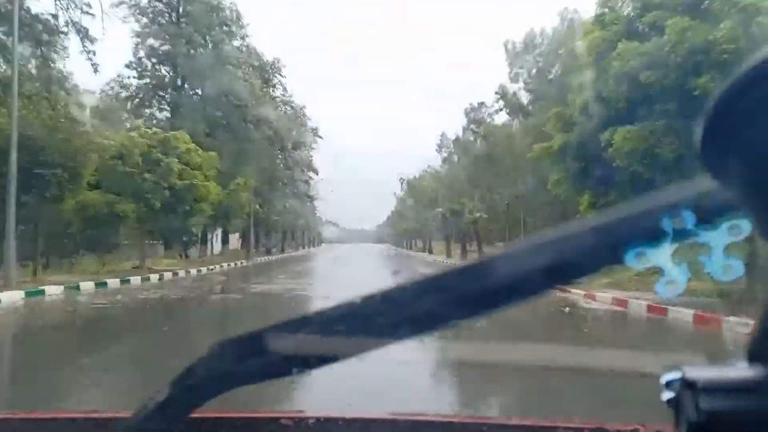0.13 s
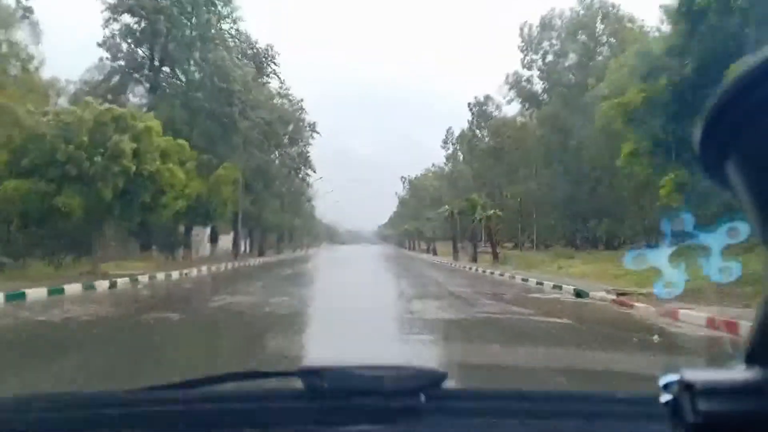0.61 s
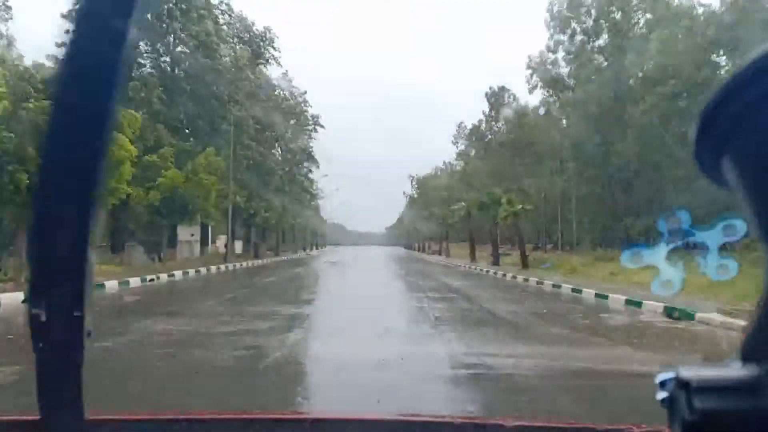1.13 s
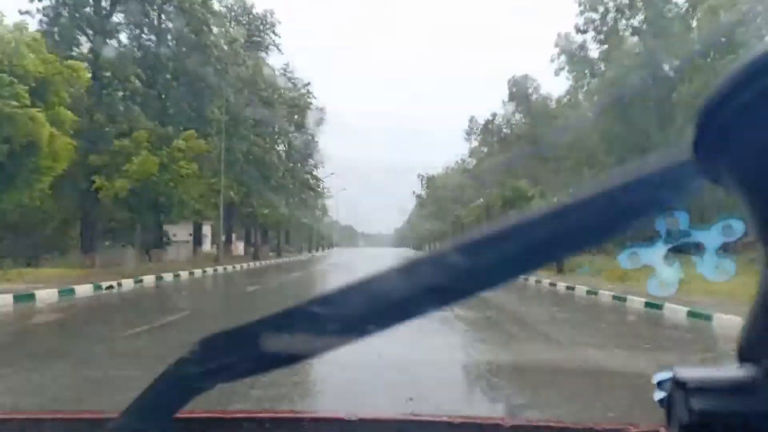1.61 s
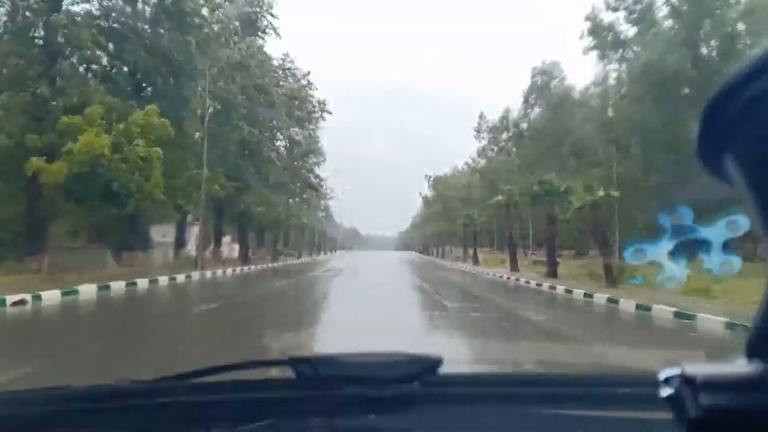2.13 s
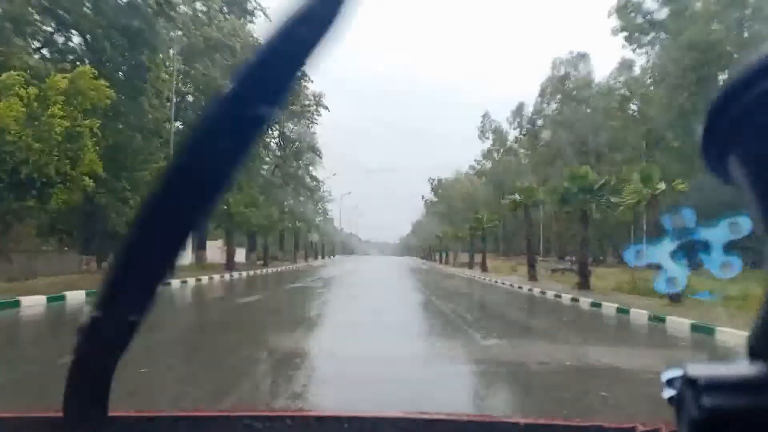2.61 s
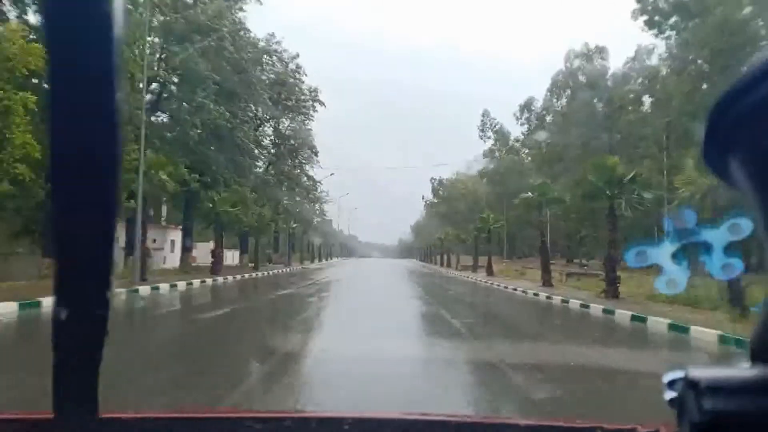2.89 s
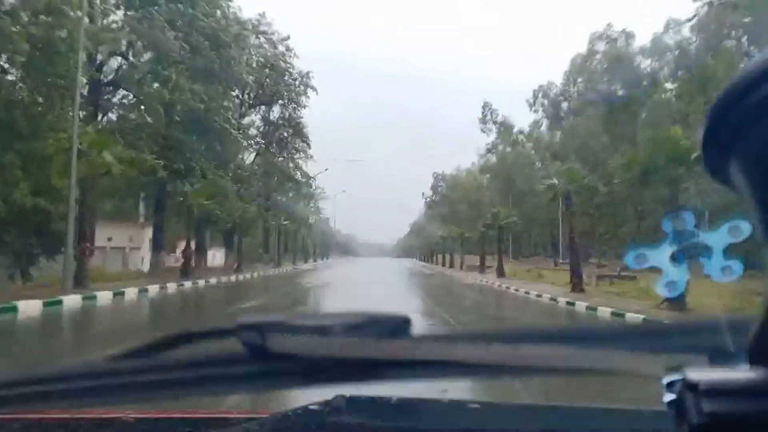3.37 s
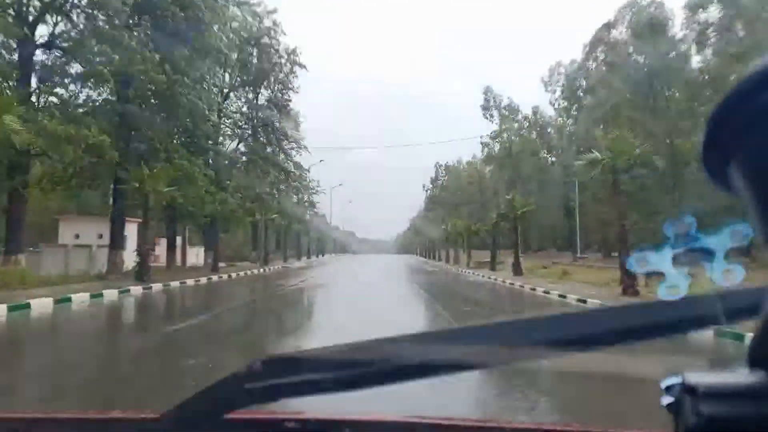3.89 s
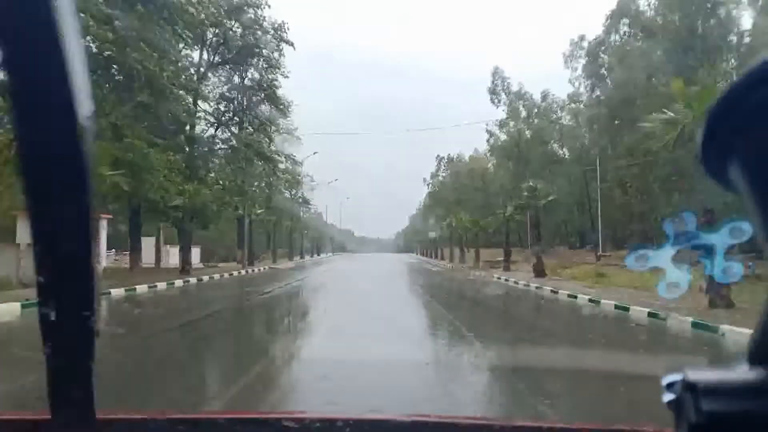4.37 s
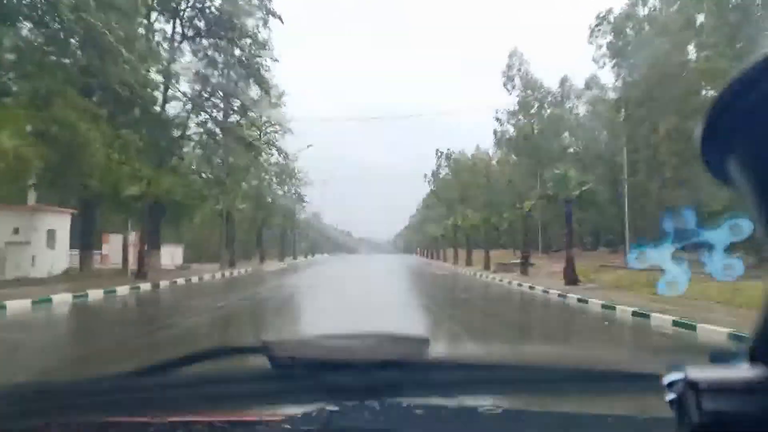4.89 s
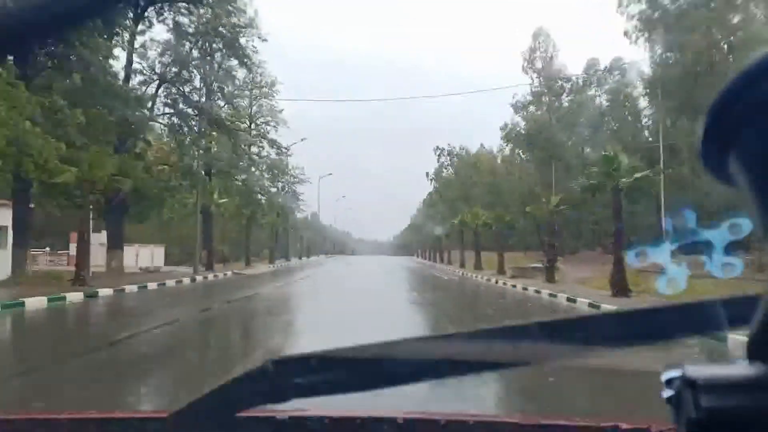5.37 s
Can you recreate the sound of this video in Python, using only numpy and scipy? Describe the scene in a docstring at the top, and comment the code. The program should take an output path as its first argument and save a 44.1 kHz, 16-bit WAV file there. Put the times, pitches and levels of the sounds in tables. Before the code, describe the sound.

Heard from inside a car driving through rain: countless small drops patter over a soft hiss of spray, with bigger drops ticking sharply at irregular moments. A deep engine drone and lumpy road rumble fill the cabin throughout, rising slightly. Wipers thump at about 1.4, 2.9 and 4.4 seconds. The stereo microphone is close inside the cabin, with wide rain and central bass.

```python
"""Inside a car driving through heavy rain: drops tick on roof and windscreen over a hiss of spray,
the road and engine boom in the cabin, and the wipers thump each time they turn round.
Rain and wiper blows are noise shaped as rings of the shell, the road is lumpy filtered noise,
engine, boom and whine are wavering sines.
Two microphone ports share the bass and hear the treble each in its own way."""
import sys
import numpy as np
from scipy import signal
from scipy.fft import rfft, irfft
from scipy.io import wavfile
from scipy.ndimage import uniform_filter1d, map_coordinates

SR = 44100
rng = np.random.default_rng(int(sys.argv[2]) if len(sys.argv) > 2 else 0)


def volts(x):
    """Linear amplitude factor 10**(x/20) for a level x in dB, scalar or array-like."""
    e = np.asarray(x, float) / 20
    return 10 ** e


def pcm_store(signal):
    """Save signal as 16-bit PCM."""
    levels = np.round(np.clip(np.atleast_2d(signal), -1, 1) * 32767)
    wavfile.write(sys.argv[1], SR, levels.astype(np.int16).T)


N = 242991

# Rain strength over time: (t/s, level/dB)
RAIN = [(0, -47), (.25, -49), (.42, -45.5), (.5, -45), (.62, -45.5), (.7, -48), (.87, -48), (1.47, -49),
        (1.89, -50), (2.19, -48.5), (2.73, -50), (3.61, -49), (3.78, -49.5), (4.22, -47), (4.42, -45),
        (4.77, -47), (5.17, -46), (5.51, -48)]
# Colour of rain as it passes roof lining and glass: (f/Hz, relative level/dB)
SHELL = [(530, -26), (900, -2), (1150, -9), (1400, -10.5), (1700, -5.5), (2050, -3), (2450, 0), (2750, -2),
         (3100, -8), (3500, -12.5), (4300, -11.5), (5100, -11), (5700, -15), (6400, -22), (7000, -26.5),
         (7700, -35), (9000, -43), (11700, -67.5), (19800, -120)]
# Colour of the thin top hiss and of the spit of a drop: (f/Hz, relative level/dB)
AIR = [(4410, -29), (7500, -4), (9120, -4.5), (9720, -12.5), (11300, -1.5), (12600, -7), (13800, 0),
       (15000, -1.5), (15600, -11)]
TREBLE_HZ = 3485  # where the body of the rain gives way to its treble


def evened(x):
    """Scales to rms 1."""
    return x / np.sqrt(np.mean(x ** 2) + 1e-20)


def height(x):
    """Top of the envelope, smoothed over 3 ms and both ports."""
    return np.sqrt(2 * uniform_filter1d((x ** 2).mean(0), size=130).max())


def read(points, hz):
    """Reads a table on a log frequency axis."""
    f, value = np.transpose(points)
    return np.interp(np.log(hz + 1), np.log(f + 1), value)


def curves(rows, t):
    """The columns of a table at the times t."""
    s, *columns = np.transpose(rows)
    return [np.interp(t, s, c) for c in columns]


def add(mix, s, sound):
    """Mixes a two-channel sound in at time s."""
    part = mix[:, round(s * SR):][:, :sound.shape[1]]
    part += sound[:, :part.shape[1]]


def band(x, lo_hz, hi_hz):
    """Steep band-pass without delay."""
    hz = np.fft.rfftfreq(x.shape[-1], 1 / SR) + 1e-3
    loss = np.sqrt((1 + (lo_hz / hz) ** 12) * (1 + (hz / hi_hz) ** 12))
    return irfft(rfft(x) / loss, x.shape[-1])


def coloured(x, db):
    """Applies a spectrum given in dB for every bin."""
    return irfft(rfft(x) * volts(db), x.shape[-1])


def wobble(per_s):
    """A smooth random curve of rms 1 with per_s knots a second."""
    knots = rng.standard_normal(int(N / SR * per_s) + 3)
    return evened(map_coordinates(knots, [np.arange(N) / SR * per_s], order=3))


def hum(hz, db, waver, flutter_db):
    """A tone: a sine that wavers a little in pitch (waver: rms share of hz) and strength."""
    turns = np.cumsum(hz * (1 + waver * wobble(12))) / SR + rng.random()
    return np.sqrt(2) * volts(db + flutter_db * wobble(14)) * np.sin(2 * np.pi * turns)


def thud(lo_hz, hi_hz, rise_s, t60):
    """A dull burst from a panel with too many damped modes to tell apart, alike in both ports."""
    t = np.arange(8000) / SR
    burst = band(rng.standard_normal((1, len(t))), lo_hz, hi_hz)
    burst *= (1 - np.exp(-t / rise_s)) * volts(-60 * t / t60)
    return burst / height(burst) * np.ones((2, 1))


def ticks(count, size=2048, spot_db=3.0):
    """Rings of the shell, one per spot and port: a dense noise of modes whose treble dies first."""
    # Decay of the shell before any further damping: (f/Hz, t60/s)
    shell_ring = [(1000, 0.15), (2500, 0.058), (5000, 0.022), (12000, 0.017)]
    port_lag_s, from_right = 0.00042, 0.65  # ticks reach the near port first; share from the right
    likeness = 0.3  # of the two ports
    crack, crack_s = 0.6, 0.002  # the first instant of a tick stands out of its ring
    hz, t, z = signal.stft(rng.standard_normal((count, 2, size)), SR, nperseg=64)
    colour_db = spot_db * rng.standard_normal((count, 1, len(hz), 1))  # each spot favours its own modes
    z = z * volts(colour_db - 60 * t / read(shell_ring, hz)[:, None])
    ring = signal.istft(z, SR, nperseg=64)[1][..., :size]
    lags = round(port_lag_s * SR) * np.where(rng.random(count) < from_right, 1, -1)
    own = np.sqrt(1 - likeness ** 2)
    ring[:, 0] = [likeness * np.roll(right, lag) + own * left for (left, right), lag in zip(ring, lags)]
    age = np.arange(size) / SR
    ring *= (1 - np.exp(-age / 0.00043)) * (1 + crack * np.exp(-age / crack_s))
    padded = np.pad(ring, ((0, 0), (0, 0), (0, 256)))
    return coloured(padded, read(SHELL, np.fft.rfftfreq(size + 256, 1 / SR)))


def blow(ring, db, treble_db, top_db, pan_db, low_db, t60=0.2):
    """One blow on the shell: its body and treble ring, and a short spit of spray on top."""
    low_hz = 2000  # low_db weighs the ring below this
    t = np.arange(ring.shape[1]) / SR
    ring = ring * volts(-60 * t / t60)
    body = band(ring, low_hz, TREBLE_HZ) + volts(low_db) * band(ring, 1, low_hz)
    treble = band(ring, TREBLE_HZ, SR)
    spit = rng.standard_normal(ring.shape) * volts(-60 * t / 0.01)
    spit = coloured(spit, read(AIR, np.fft.rfftfreq(len(t), 1 / SR)))
    layers = ((body, db), (treble, treble_db), (spit, top_db))
    pan = volts([[pan_db / 2], [-pan_db / 2]])  # left over right
    return sum(volts(d) * x / height(x) for x, d in layers) * pan


def patter(per_s, spread_db, spray, treble_spray):
    """Countless small drops on many spots, a few larger, over the even hiss of spray."""
    usual_db, usual_treble_db = -48, -56  # body and treble of rain at its usual strength
    brighten = 1.8  # treble dB gained per dB of strength
    spots = ticks(count=24)
    size = volts(spread_db * np.minimum(rng.exponential(1, N), 4)) * (rng.random(N) < per_s / SR)
    spot = rng.integers(0, len(spots), N)
    taps = np.zeros((2, N))
    for k, ring in enumerate(spots):
        taps += signal.oaconvolve((size * (spot == k))[None], ring, axes=1)[:, :N]
    hiss = coloured(rng.standard_normal((2, N)), read(SHELL, np.fft.rfftfreq(N, 1 / SR)))
    share = np.array([[[spray]], [[treble_spray]]])  # power share of the hiss
    low, high = np.sqrt(1 - share) * evened(taps) + np.sqrt(share) * evened(hiss)
    body_db, = curves(RAIN, np.arange(N) / SR)
    treble_db = usual_treble_db + brighten * (body_db - usual_db)
    body = evened(band(low, 1, TREBLE_HZ))
    treble = evened(band(high, TREBLE_HZ, SR))
    return volts(0.34 * wobble(11)) * (volts(body_db) * body + volts(treble_db) * treble)


def drops():
    """Large drops and middling ones that follow the rain, each on its own spot, and a few dull taps."""
    # The largest drops, at the height of the tick: (t/s, body level/dB, treble level/dB, top level/dB)
    large = [(.0869, -43.5, -56.5, -76.5), (.1635, -33.5, -38.5, -60), (.2534, -39.5, -47.5, -60.5),
             (.2616, -45.5, -44, -66.5), (.2796, -38.5, -44.5, -70), (.4134, -36, -40.5, -62.5),
             (.4736, -40, -45.5, -61), (.5117, -41, -43.5, -70), (.5204, -41, -38, -61),
             (.566, -41.5, -44, -60), (.594, -34.5, -47.5, -65.5), (.636, -47.5, -48, -77),
             (.7878, -42, -40, -62.5), (.829, -43, -46, -67), (.9092, -44.5, -46, -67.5),
             (.9236, -33.5, -46, -70), (.9733, -43.5, -44, -85), (1.0013, -35.5, -39, -61.5),
             (1.0345, -38.5, -43, -81), (1.0454, -47, -40, -69.5), (1.0938, -37.5, -40, -71),
             (1.1422, -53.5, -45.5, -61.5), (1.2551, -41.5, -43.5, -75), (1.323, -58.5, -44.5, -65.5),
             (1.4517, -45, -48.5, -71.5), (1.542, -35, -46, -61.5), (1.6268, -40.5, -42.5, -61),
             (1.7645, -39, -50, -73), (1.9504, -47.5, -49.5, -69), (1.9994, -45.5, -54.5, -72),
             (2.0435, -41.5, -41.5, -70), (2.0585, -38.5, -40, -61.5), (2.2964, -36.5, -41, -68),
             (2.307, -47, -44, -63), (2.4188, -46.5, -46.5, -65.5), (2.8964, -35.5, -43.5, -69),
             (2.922, -46.5, -46, -67.5), (2.9588, -39, -38, -83), (2.9834, -41, -47.5, -68.5),
             (3.0985, -40, -51.5, -67.5), (3.143, -45.5, -43.5, -78), (3.3449, -41.5, -41, -65),
             (3.3603, -36.5, -45, -67.5), (3.3793, -47, -47, -68.5), (3.425, -47, -45, -71),
             (3.4455, -35.5, -46, -65.5), (3.4984, -48, -45, -73.5), (3.601, -46, -47, -70),
             (3.66, -45, -48, -67.5), (3.719, -48, -48.5, -69), (3.7485, -42, -43.5, -64),
             (3.7626, -29.5, -41.5, -74), (3.8052, -53, -39.5, -63.5), (3.813, -44.5, -46, -63),
             (3.841, -38.5, -59, -80), (3.8872, -37.5, -44.5, -72.5), (4.149, -37.5, -50, -71),
             (4.18, -36.5, -51.5, -78.5), (4.274, -34.5, -48, -59.5), (4.3694, -39, -46, -64.5),
             (4.442, -43, -47, -70.5), (4.5093, -44.5, -43.5, -75.5), (4.5415, -40, -38.5, -60.5),
             (4.5965, -50, -48.5, -66.5), (4.5795, -41, -53, -70), (4.6808, -40, -45.5, -58.5),
             (4.743, -39, -44.5, -68), (4.8233, -38, -48, -64.5), (4.9141, -38.5, -51.5, -77),
             (4.9349, -33.5, -41, -71.5), (5.0526, -31, -40, -57.5), (5.0716, -40.5, -47.5, -67.5),
             (5.0997, -39, -40, -59), (5.196, -50, -43.5, -67), (5.2436, -34, -43, -62.5),
             (5.2905, -51.5, -43.5, -71), (5.3244, -37.5, -40.5, -63), (5.3599, -34.5, -46, -79)]
    # Dull taps, heard only as a ring of the shell between 1150 and 2300 Hz: (t/s, level/dB)
    dull_taps = [(4.3, -34), (0.14, -48), (0.77, -45)]
    count = 140  # middling drops
    # middling drops against the rain strength: body, treble, top (dB)
    middling_db, spread_db = (-3, -9, -29.5), (3.5, 0.5, 3.5)
    when = rng.random(count) * N / SR
    rain_db, = curves(RAIN, when)
    levels_db = rng.standard_normal((count, 3)) * spread_db + middling_db + rain_db[:, None]
    rows, out = [*large, *np.column_stack([when, levels_db])], np.zeros((2, N))
    for (s, *levels), ring in zip(rows, ticks(count=len(rows))):
        pan_db = 2 - rng.standard_normal()
        add(out, s, blow(ring, *levels, pan_db, low_db=-6))  # a drop hardly stirs the low shell
    for (s, db), ring in zip(dull_taps, band(ticks(count=len(dull_taps)), 1150, 2300)):
        add(out, s, volts(db) * ring / height(ring))
    return out


def wipers():
    """The blade flips with a double slap on the glass; bending waves bring high modes first, low ones later."""
    # Turning points: (t/s, slap level/dB, knock level/dB, thump level/dB, thump lag/s at 350 Hz)
    turns = [(1.379, -31, -43, -21, 0.0062), (2.879, -30, -37.5, -21.5, 0.007),
             (4.396, -29.5, -37, -22.5, .005)]
    # Modes that the wiper arm shakes: (f/Hz, level/dB against the knock or thump, t60/s)
    cowl = [(165.4, 6, 0.098), (223.4, 3.5, 0.15), (266, 2, 0.11), (347, 6.5, 0.087), (389.6, 5, 0.083),
            (431, -9.5, .1), (510, 0, 0.07), (580, -6.5, .06), (624, -13, 0.047), (740.3, -15, 0.04),
            (884, -19, 0.019), (1210, 3, 0.02), (1350, 7.5, 0.025), (1530, 7.5, 0.022)]
    knock_hz = 1000  # modes above this make the knock, those below the thump
    flip_s, flip_db = 0.0027, -6.5  # the rubber lip lands first and weaker, the blade follows
    out, t = np.zeros((2, N)), np.arange(6000) / SR
    rings = ticks(count=2 * len(turns))
    for (s, slap_db, knock_db, thump_db, lag), lip, blade in zip(turns, rings[::2], rings[1::2]):
        for when, db, ring in ((s, slap_db + flip_db, lip), (s + flip_s, slap_db, blade)):
            # the rubber damps the glass, so the ring is shorter than a drop's
            add(out, when, blow(ring, db, db - 3.5, db - 33.5, pan_db=0, low_db=-1, t60=0.18))
        add(out, s + lag, volts(thump_db - 10.0) * thud(110, 815, 0.0016, 0.1))  # the dashboard booms along
        for k, (hz, db, t60) in enumerate(cowl):
            late = np.maximum(t - lag * np.sqrt(350 / hz), 0)
            phase = np.array([[0], [hz / 400 * rng.standard_normal()]])  # ports drift apart with pitch
            swell = (-1) ** k * (1 - np.exp(-late * hz / 2.93)) * volts(db - 60 * late / t60)
            level_db = (knock_db if hz > knock_hz else thump_db) + rng.standard_normal()
            mode = np.sin(2 * np.pi * hz * rng.uniform(0.93, 1.02) * late + phase)
            add(out, s, volts(level_db) * swell * mode)
    return out


def road():
    """Tyre and body noise in the cabin resonances; four ranges, lumpy with the road surface."""
    # Road noise over time: (t/s, low rumble level/dB, upper rumble level/dB, body drone level/dB)
    road_levels = [(0, -41, -37.5, -37.5), (.4, -42, -37.5, -40.5), (.7, -30.5, -36, -37.5),
                   (1.0, -38.5, -36.5, -39), (1.3, -44, -39.5, -37), (1.6, -33.5, -35, -39),
                   (1.9, -42, -32, -38), (2.1, -34, -28.5, -36.5), (2.3, -32, -29.5, -36),
                   (2.55, -29.5, -30.5, -36.5), (2.75, -37.5, -31, -36), (3.1, -33.5, -33.5, -37),
                   (3.5, -41, -32, -36.5), (4.0, -38.5, -36.5, -37.5), (4.5, -37.5, -32.5, -37),
                   (5.0, -36, -34, -36.5), (5.51, -31.5, -34.5, -35)]
    # Where the four ranges meet: (f/Hz)
    splits = (44, 95.6, 184)
    # Colour that both ports share: (f/Hz, relative level/dB)
    cabin_mid = [(13, -38.5), (22, -12), (35, 8.5), (49, 1.5), (133, -5.5), (235, -11.5), (280, -13.5),
                 (334, -10.5), (392, -17.5), (436, -20.5), (588, -23), (631, -23), (689, -25.5),
                 (1070, -39), (1500, -48), (1950, -47.5), (3300, -120)]
    # Standing waves that differ between the ports: (f/Hz, level/dB against the shared part)
    cabin_side = [(40, -32), (62, -16.5), (85, -2.5), (110, -9), (160, -12), (270, -12), (450, -1.5),
                  (740, 1.5), (1220, 3)]
    deepest_db = -47.5  # mean level of the deepest range, which is the lumpiest
    lumps_db = (2.8, 1.3, 1.2, 0.97)  # how lumpy each range is
    flutter_db = 1.13  # quick shudder
    hz = np.fft.rfftfreq(N, 1 / SR)
    mid_db = read(cabin_mid, hz)
    mid = coloured(rng.standard_normal(N), mid_db)
    side = coloured(rng.standard_normal(N), mid_db + read(cabin_side, hz))
    edges, out = (1, *splits, 4000), np.zeros((2, N))
    for k, db in enumerate([deepest_db, *curves(road_levels, np.arange(N) / SR)]):
        m, s = band(np.array([mid, side]), edges[k], edges[k + 1])
        level_db = db + lumps_db[k] * wobble(5.33) + flutter_db * wobble(22)
        out += volts(level_db) * np.array([m + s, m - s]) / np.std(m)
    return out


def low_thuds():
    """Low thuds in the cabin, some from the road, some as the wipers turn: short bursts of band noise."""
    # The thuds: (t/s, level/dB, middle of the band f/Hz)
    thuds = [(0.602, -24, 165), (0.719, -23, 143), (1.408, -20.5, 92), (1.926, -25.5, 165),
             (1.966, -14, 95), (2.044, -22, 143), (2.19, -18, 97), (2.448, -24, 97), (2.531, -21.5, 146),
             (2.691, -31.5, 134), (2.94, -26, 175.7), (3.807, -26.5, 169.2), (4.13, -23, 167.8),
             (4.392, -25.5, 151), (4.427, -24, 108), (4.59, -20.5, 214)]
    out = np.zeros((2, N))
    for s, db, hz in thuds:
        add(out, s, volts(db) * thud(hz / 1.08, hz * 1.17, 0.0039, 0.2))
    return out


def engine():
    """The car gathers speed; each multiple of the firing rate swells as it rises through a body resonance."""
    # Firing rate over time: (t/s, f/Hz)
    firing_rate = [(0, 45.6), (1.5, 46.35), (2.1, 46.95), (3.1, 47.6), (3.9, 48.7), (4.8, 49.95),
                   (5.51, 50.8)]
    # Body resonances that pass engine tones: (f/Hz, width at half amplitude/Hz, level/dB)
    resonances = [(48.5, 4.5, -34), (88.7, 21, -34.5), (143, 12, -42.5), (185, 8.8, -45),
                  (234.1, 13, -42.5), (397.8, 13.3, -45.5), (467.4, 11, -58.5), (566, 11, -64),
                  (632.3, 25, -54), (698, 9.9, -57)]
    multiples, growth_db_per_s = 16, 0.5  # tones above the fifth multiple grow steadily with time
    t = np.arange(N) / SR
    firing, = curves(firing_rate, t)
    out, ports = np.zeros((2, N)), np.array([[1], [-1]])
    for k in range(1, multiples + 1):
        hz = k * firing
        power = sum(volts(2 * db) / (1 + (2 * (hz - peak_hz) / width) ** 2) ** 2
                    for peak_hz, width, db in resonances)
        tone = hum(hz, growth_db_per_s * t * (k > 5), 0.0015, 1.6)
        out += np.sqrt(power) * tone * volts(ports * hz / 600)  # higher tones lean left
    return out


def boom():
    """A hum of the cabin air that beats against the engine."""
    # Drift of the hum: (t/s, f/Hz, level/dB)
    boom_drift = [(0, 57.53, -40.5), (.9, 58.02, -36.5), (1.6, 58, -34.5), (2.4, 57.9, -32.5),
                  (2.7, 54.4, -36.5), (3.2, 57.34, -34.5), (4.0, 55.93, -39), (4.6, 56.5, -36),
                  (5.0, 57.4, -37), (5.51, 58.17, -29)]
    return hum(*curves(boom_drift, np.arange(N) / SR), 0.02, 2.7)


def whine():
    """A faint whine that holds its pitch but for a slight waver."""
    # Strength over time: (t/s, level/dB)
    whine_level = [(0, -56), (.3, -49), (.9, -55.5), (2.2, -52), (2.6, -63.5), (5.51, -70.5)]
    return hum(395, *curves(whine_level, np.arange(N) / SR), 0.0046, 1.5)


def air():
    """A thin hiss at the top of the range, unrelated in the two ports."""
    # Strength over time: (t/s, level/dB)
    air_level = [(0, -74), (.2, -81), (.64, -76), (1.49, -77), (1.95, -78), (2.18, -73.5), (2.5, -78.5),
                 (2.96, -74.5), (3.16, -78), (4.11, -77.5), (4.35, -76), (5.51, -78)]
    hiss = coloured(rng.standard_normal((2, N)), read(AIR, np.fft.rfftfreq(N, 1 / SR)))
    db, = curves(air_level, np.arange(N) / SR)
    return volts(db + 1.3 * wobble(30) + 0.7 * wobble(6)) * evened(hiss)


def scene():
    """Everything heard in the cabin."""
    rain = patter(per_s=450, spread_db=2.84, spray=0.39, treble_spray=0.088) + drops()
    return rain + wipers() + road() + low_thuds() + engine() + boom() + whine() + air()


def low_pass(x):
    """Removes everything above the highest recorded frequency."""
    return signal.sosfilt(signal.butter(12, 15700, fs=SR, output="sos"), x)


def record(dry):
    """The microphone cuts the deepest bass and the left port is slightly weaker; the ends are soft."""
    bass_cut = signal.butter(8, 40.5, "high", fs=SR, output="sos")
    mix = signal.sosfilt(bass_cut, dry) * signal.windows.tukey(N, 0.002)
    mix *= volts([[-0.3], [0.3]])
    return low_pass(mix)


dry = scene()
out = record(dry)
pcm_store(out)
```